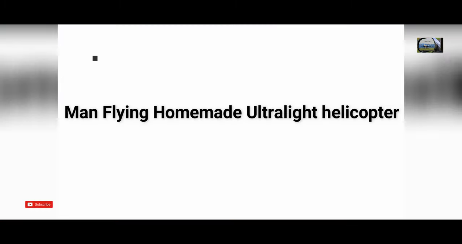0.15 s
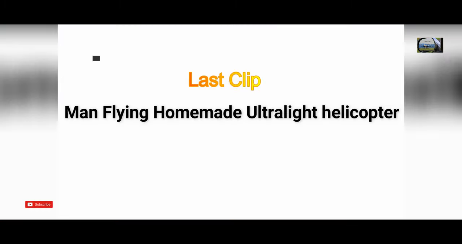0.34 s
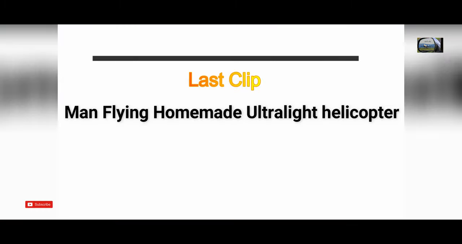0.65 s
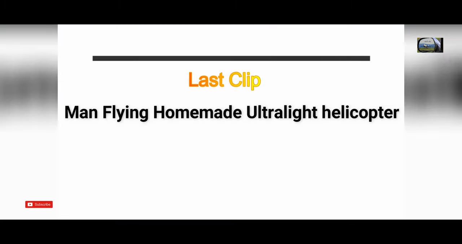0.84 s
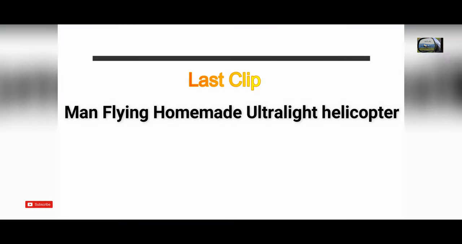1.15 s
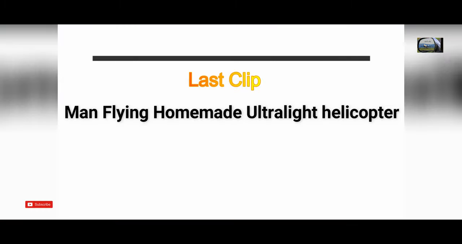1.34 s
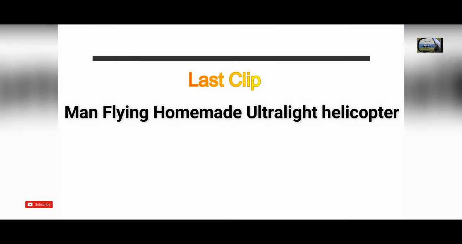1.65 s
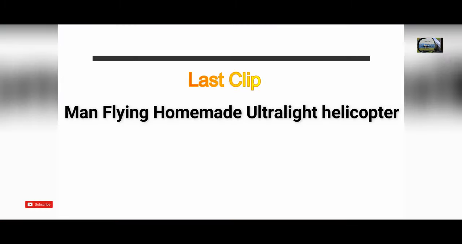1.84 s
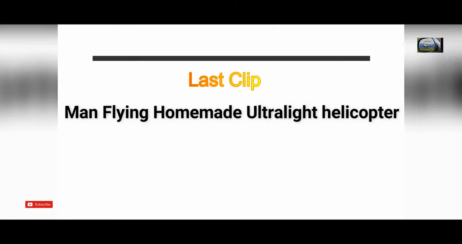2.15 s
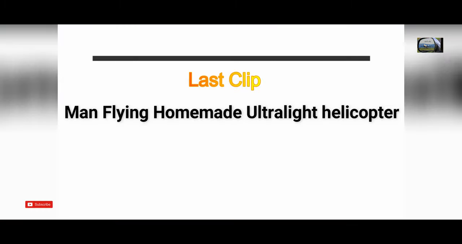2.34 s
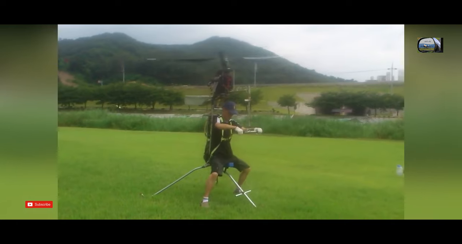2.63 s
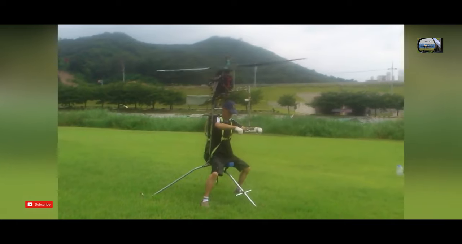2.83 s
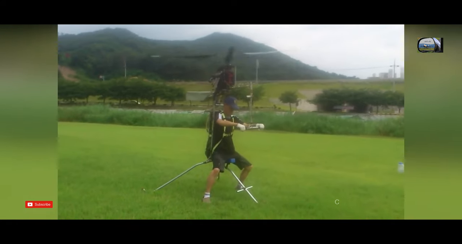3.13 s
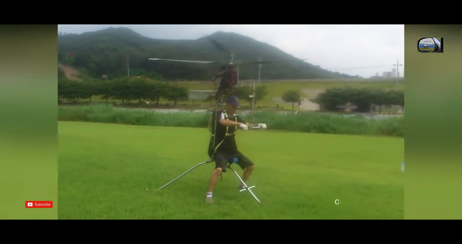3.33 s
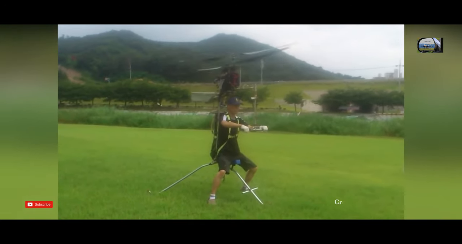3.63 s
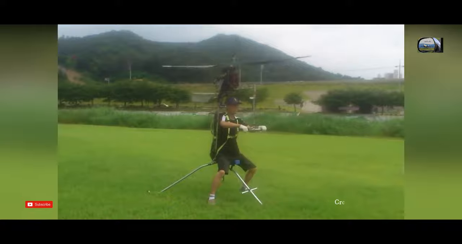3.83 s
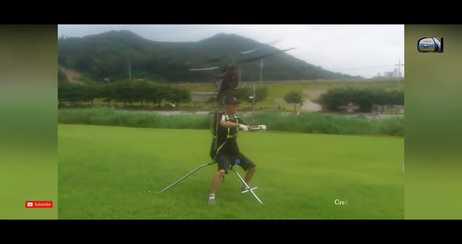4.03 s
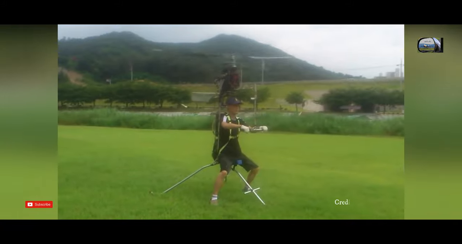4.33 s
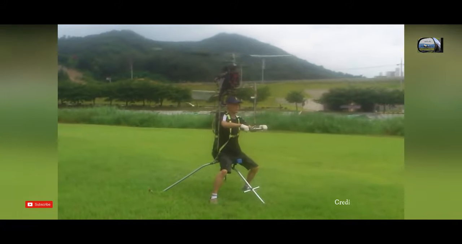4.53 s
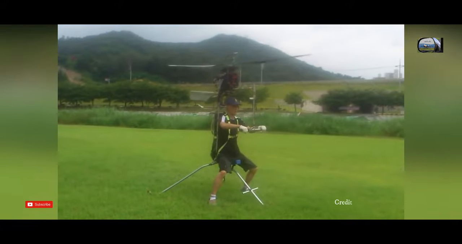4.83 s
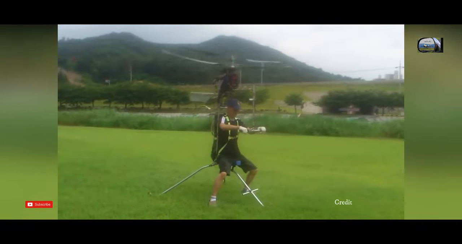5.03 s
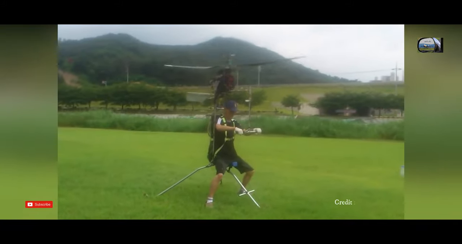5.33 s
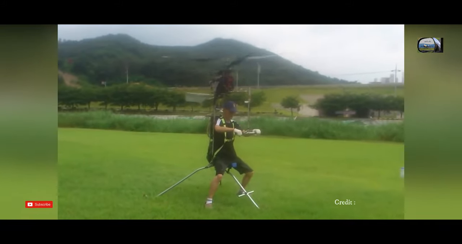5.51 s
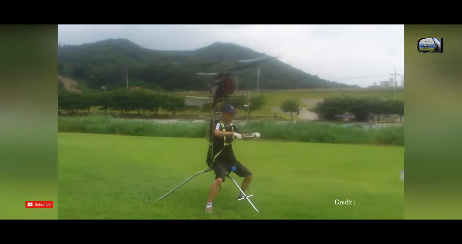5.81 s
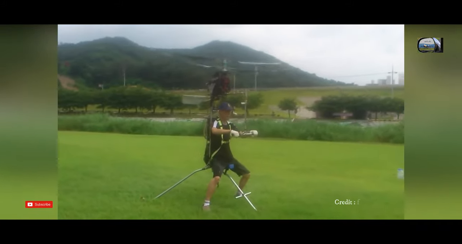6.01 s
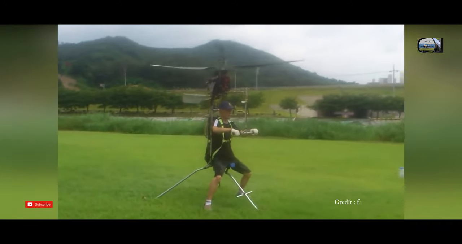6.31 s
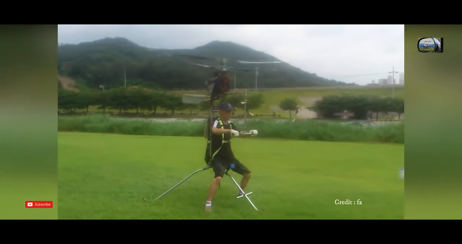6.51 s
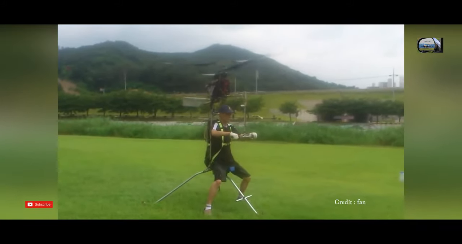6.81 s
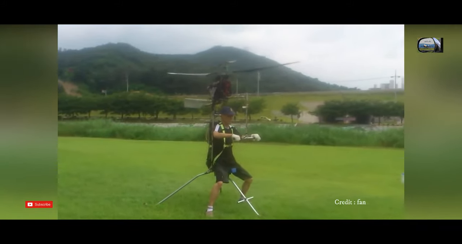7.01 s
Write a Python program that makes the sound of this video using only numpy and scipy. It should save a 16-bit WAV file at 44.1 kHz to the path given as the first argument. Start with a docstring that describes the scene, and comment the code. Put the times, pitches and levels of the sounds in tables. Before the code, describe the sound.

From about 0.2 seconds, the small two-stroke engine of a backpack helicopter idles in an open field. It pulses quickly and roughly, with soft puffs and irregular sharper pops, a tinny exhaust rasp and a low, hollow rumble underneath. At about 3.2 seconds the throttle opens. The engine gives a brief growl, rises quickly in pitch, and by 3.5 seconds fires evenly in a hard buzz with a bass note. From there the pitch climbs slowly as the rotor gathers speed, and a grainy hiss from the drive swells. From around 4.5 to 6 seconds the rasp smooths into a more ringing drone. Rotor wind buffets the microphone in short low gusts between 6.3 and 6.7 seconds. The engine stays near the centre and is still running fast at the end, just after 7 seconds.

```python
"""Backpack helicopter run-up

A twin-cylinder two-stroke idles on an open field, then opens up and turns its rotor. At idle most strokes only
puff and some catch with a pop; under throttle both cylinders fire every turn. Each stroke rings silencer, shell
and headers and lets out a rasp of gas, over the low, hollow churn of the rotor wash. The drive hisses and rotor
wash buffets the microphone."""
import sys
import numpy as np
from scipy import signal
from scipy.fft import rfft, irfft
from scipy.io import wavfile
from scipy.ndimage import uniform_filter1d

SR = 44100
rng = np.random.default_rng(int(sys.argv[2]) if len(sys.argv) > 2 else 0)


def generate_wav(sig):
    """Save sig (samples, or channels by samples) to the path in sys.argv[1] as 16-bit PCM at SR."""
    pcm = np.round(np.clip(np.atleast_2d(sig).T, -1, 1) * 32767).astype(np.int16)
    wavfile.write(sys.argv[1], SR, pcm)


N = 315756

FIRST_STROKE_S, THROTTLE_OPEN_S = 0.193, 3.21
LOAD_S, ALL_FIRE_S = 3.34, 3.468  # misses start to die out; last miss is over
SMOOTH_FROM_HZ, SMOOTH_SPAN_HZ = 99, 10.6  # firing rates over which the rasp falls away

# climb under throttle (time [s], firing rate [Hz])
FIRING_CLIMB = [(3.37, 77.69), (3.48, 85.99), (3.53, 88.55), (3.6, 89.95), (3.66, 93.7), (3.8, 96.35),
                (4.28, 97.55), (4.52, 100.14), (4.62, 100.51), (4.72, 101.91), (5.12, 104.78),
                (5.24, 103.92), (5.38, 107.0), (5.88, 111.18), (6.07, 113.37), (6.25, 114.45),
                (6.65, 118.4), (7.14, 120.75)]
# idle strokes that catch (time [s], relative exhaust level [dB], relative gas level [dB])
IDLE_POPS = [(0.206, -25, -35.5), (0.2216, -25.5, -33), (0.2339, -30, -26.5), (0.2501, -23, -34),
             (0.278, -28, -39), (0.349, -25, -27), (0.3637, -26.5, -41), (0.3914, -23.1, -27.5),
             (0.4612, -25.5, -30), (0.4892, -25, -29.5), (0.5057, -24.5, -35), (0.5342, -22.5, -29),
             (0.6032, -24, -31.5), (0.632, -26, -38), (0.646, -27, -41), (0.6756, -23, -26),
             (0.746, -28, -33), (0.774, -24, -29.5), (0.79, -25.5, -35), (0.82, -29.5, -41),
             (0.8476, -26.5, -36), (0.8747, -27, -35), (0.8882, -27, -31), (0.916, -26, -41),
             (0.945, -26.5, -44), (0.9878, -24, -30.5), (1.0022, -29, -33), (1.0292, -28, -29),
             (1.102, -23, -29), (1.1306, -25, -39), (1.1427, -34, -35), (1.1716, -26, -28.5),
             (1.2437, -26, -33.5), (1.2736, -23.5, -30.5), (1.3143, -25.8, -30.0), (1.372, -28, -42),
             (1.3863, -26.5, -35), (1.416, -23.4, -26), (1.4293, -30, -32), (1.4564, -26, -31.5),
             (1.558, -23.6, -30), (1.5875, -25.5, -32), (1.6009, -27, -29), (1.688, -27.5, -28.5),
             (1.7031, -25.5, -34), (1.731, -23, -32.5), (1.774, -30, -47), (1.832, -25, -28.5),
             (1.847, -25, -39), (1.875, -22.5, -30), (1.946, -26, -32), (1.9744, -25, -28),
             (1.99, -26, -33), (2.018, -25, -38), (2.089, -27, -32), (2.1167, -25, -26),
             (2.16, -25.5, -34.5), (2.203, -28, -42), (2.2313, -26, -26), (2.2474, -24, -30),
             (2.259, -25, -28.5), (2.331, -28.5, -40), (2.36, -27.5, -36), (2.374, -26.5, -26.5),
             (2.3885, -24, -37), (2.4011, -25, -30), (2.43, -26.5, -44), (2.488, -26, -41),
             (2.5016, -25, -35.5), (2.5153, -32, -27), (2.5307, -24, -29.5), (2.5437, -23, -30),
             (2.601, -29, -42), (2.6441, -27, -34.5), (2.658, -34, -34), (2.6734, -22.5, -28),
             (2.6882, -21.5, -30), (2.773, -27, -40), (2.787, -25, -41), (2.8013, -32, -27),
             (2.817, -23, -29.5), (2.859, -28, -48), (2.886, -26, -32), (2.915, -23, -29),
             (2.9297, -27, -49), (2.9582, -21, -26.5), (3.028, -30, -35), (3.0575, -25, -25),
             (3.072, -28, -40), (3.1008, -24.5, -29.5), (3.1289, -25, -38), (3.1707, -29, -27.5),
             (3.199, -24, -29), (3.241, -22, -25.5), (3.269, -23.0, -28), (3.3079, -26, -26.5),
             (3.3345, -22.8, -27), (3.3486, -19.5, -27), (3.375, -23, -33.5), (3.3993, -24, -32),
             (3.4115, -21, -21.5), (3.4228, -24.5, -33), (3.4356, -21, -28.5), (3.4472, -19, -29)]
# other idle strokes, a row per cylinder (relative exhaust level [dB], relative gas level [dB])
IDLE_PUFFS = [(-39, -48.5), (-31, -44.5)]

# drive hiss (frequency [Hz], relative density [dB])
HISS_SPECTRUM = [(300, -0.5), (640, -2), (760, 3), (880, -1), (1100, -1), (1800, 2), (3000, -2),
                 (6000, -1.5), (7000, -1.5), (8000, -5.5), (10200, -2.5), (12500, -10), (15500, -16)]
# low, hollow churn of the rotor wash (frequency [Hz], relative density [dB])
CHURN_SPECTRUM = [(30, -45), (60, -11.5), (90, 1), (138, -5), (175, -10), (210, -8.5), (255, -24),
                  (320, -8), (400, -22), (520, -6), (660, -10), (760, -23.5), (1000, -13), (2000, -34)]
# wind on the microphone (frequency [Hz], relative density [dB])
BUFFET_SPECTRUM = [(15, 7), (35, -2), (60, 0), (120, 6), (190, -5), (260, 4), (380, -5), (1500, -70)]
# rotor wash gusts (centre [s], length [s], churn level [dB], buffet level [dB])
WASH_GUSTS = [(3.56, 0.09, -32, -57), (6.325, 0.04, -21, -42), (6.378, 0.03, -21, -42),
              (6.573, 0.07, -47, -41), (6.674, 0.033, -53, -39)]
# gas jet at idle (frequency [Hz], relative density [dB])
IDLE_RASP_SPECTRUM = [(400, -26), (550, -13), (700, -2), (770, -18), (900, 1.5), (1080, 18), (1200, 11.5),
                      (1340, 5), (1450, 11.5), (1620, 14), (1860, -21), (2050, 8), (2230, 4), (2400, -20),
                      (2580, 10), (2780, 8.5), (3050, -3), (3420, -5.5), (3750, 5), (4100, 1.5),
                      (4600, 1.5), (5300, -3.5), (8000, -7), (10200, -2), (15500, -27)]
# gas jet under load (frequency [Hz], relative density [dB])
LOAD_RASP_SPECTRUM = [(400, -18), (550, 11), (760, -6), (1080, 8), (1340, 1), (1550, 5.5), (2000, 0),
                      (2400, -5.5), (2750, 1.5), (3250, -9.5), (3800, 2), (4700, -4), (6200, -5.5),
                      (8000, -10.5), (10200, -1.5), (15500, -22)]
# spit of the open port (frequency [Hz], relative density [dB])
SNAP_SPECTRUM = [(1500, -32), (4000, -14), (8000, -13), (10500, 3), (13000, 0), (15500, -2)]

# silencer, cool gas at idle (nominal frequency [Hz], width [Hz], cylinder 0 [dB], cylinder 1 [dB])
IDLE_SILENCER_MODES = [(204, 41, -16, -12.5), (298, 82, -23, -15), (442, 104, -4.5, -15.5),
                       (510, 124, 2, -2), (528.2, 30, 1, 2), (670, 87, -9.5, -9.5)]
# silencer (nominal frequency [Hz], width [Hz], cylinder 0 [dB], cylinder 1 [dB])
SILENCER_MODES = [(110, 140, -51, -16), (219.4, 55, -11, -16.5), (413, 124, -10, -15.5),
                  (530, 113, 0, -6.5), (573, 60, -1, -3.5), (639, 116, -13, -6), (1014, 242, -8.5, -21),
                  (1134.4, 114, -9, -5.5), (1240, 96, -8.5, -16)]
# header pipes (nominal frequency [Hz], width [Hz], cylinder 0 [dB], cylinder 1 [dB])
HEADER_MODES = [(1537, 132, -10, -7.5), (1603, 164, -19.5, -5.5), (1896, 260, -12, -11),
                (2195, 150, -35, -11.5), (2743, 220, -17, -17.5), (3860, 170, -17, -14.5)]
# silencer shell (frequency [Hz], decay [s], relative level [dB])
SHELL_MODES = [(348.2, 0.031, -26), (1442, .012, -14.5), (1557, 0.027, -19), (2180, 0.019, -31),
               (2580, 0.0089, -25), (2755, 0.016, -29), (3250, 0.01, -23), (3800, 0.0089, -20),
               (3980, 0.0052, -32), (4930, .007, -32)]

# ground reflection dips and peaks (frequency [Hz], width [Hz], gain [dB])
GROUND_BANDS = [(252, 28, -4.5), (753, 59, -8.5), (1364, 74, -3), (2390, 90, 2.5), (3470, 75, 3),
                (4560, 140, -4), (5010, 110, -4)]
# machine drifting towards the middle (time [s], left minus right [dB])
PAN_DRIFT = [(2.6, 0.8), (6.3, 0.2)]
# diffuse sound at the microphone pair (frequency [Hz], coherence [0-1])
MIC_COHERENCE = [(30, 0.14), (70, 1), (200, 1), (600, 0.61), (1100, 0.83), (2000, 0.23), (5000, 0.77),
                 (9000, 0.035), (15000, 0.33)]
# microphone pair imbalance (frequency [Hz], left minus right [dB])
MIC_BALANCE = [(120, -.5), (450, 1), (700, -.5), (1400, 0), (2500, 4), (4000, 2), (6000, 0.4), (8000, 2.7),
               (9600, 19.5), (11000, 14.4), (13000, 10.5), (15500, 9)]
# sign per channel (left, right)
SIDES = np.array([[1], [-1]])


def undb(db):
    """Decibels to gain."""
    return 10 ** (np.asarray(db) / 20)


def curve(table, times):
    """A (time, value) table at the given times."""
    return np.interp(times, *np.transpose(table))


def on_bins(table):
    """A (frequency, value) table on every FFT bin."""
    hz, value = np.transpose(table)
    return np.interp(np.log(np.fft.rfftfreq(N, 1 / SR) + 1), np.log(hz), value)


def unit(x):
    """Scale to rms 1."""
    return x / np.sqrt(np.mean(x ** 2))


def blend(low, high, share):
    """Low at share 0, high at share 1."""
    return low + (high - low) * share


def walk(rate_hz):
    """Random steps, smoothed twice, rms 1."""
    hold = int(SR / rate_hz)
    steps = np.repeat(rng.standard_normal(N // hold + 1), hold)
    return unit(uniform_filter1d(uniform_filter1d(steps, hold), hold)[:N])


def air(spectrum, envelope):
    """Diffuse stereo noise, enveloped and then filtered."""
    coherence = np.clip(on_bins(MIC_COHERENCE), 0, 1)
    mid, side = rfft(rng.standard_normal((2, N)) * envelope)
    pair = mid * np.sqrt(1 + coherence) + SIDES * side * np.sqrt(1 - coherence)
    return irfft(pair * unit(undb(on_bins(spectrum))), N) / np.sqrt(2)


def clicks(times, sizes):
    """Impulses, each split between two adjacent samples."""
    place = np.clip(times * SR, 0, N - 2)
    i = place.astype(int)
    return np.bincount(i, sizes * (1 - place + i), N) + np.bincount(i + 1, sizes * (place - i), N)


def load(t, ramp_s=0.064):
    """0 at idle, 1 under load."""
    return np.clip((t - LOAD_S) / ramp_s, 0, 1)


def settle(t, lag_s):
    """First-order rise from 0 to 1 as the load comes on."""
    return 1 - np.exp(-np.maximum(t - LOAD_S, 0) / lag_s)


def firing_hz(t, idle_hz=70.75, sag_hz=1.1, sag_at_s=1.7):
    """Stroke rate: the idle sags and recovers, then climbs under throttle."""
    idle = [(FIRST_STROKE_S, idle_hz), (sag_at_s, idle_hz - sag_hz), (THROTTLE_OPEN_S, idle_hz)]
    return curve([*idle, *FIRING_CLIMB], t)


def smoothness(times):
    """0 at low revs, 1 once the exhaust note has smoothed out."""
    return np.clip((firing_hz(times) - SMOOTH_FROM_HZ) / SMOOTH_SPAN_HZ, 0, 1)


def strokes(t, wobble_hz=7.5, depth_hz=0.27):
    """Stroke times and cylinders, two per shaft turn; uneven rotor load wobbles the rate."""
    t = t[t >= FIRST_STROKE_S]
    wobble = depth_hz * load(t) * np.sin(2 * np.pi * wobble_hz * t + walk(2)[:len(t)])
    half_turns = np.cumsum(firing_hz(t) + wobble) / SR
    stroke = np.arange(int(half_turns[-1]) + 1)
    return np.interp(stroke, half_turns, t), stroke % 2


def idle_firing(times, cylinder, scatter_db=0.5, jitter_s=0.000169):
    """Soft puffs, each pop replacing the nearest (time [s], exhaust [dB], gas [dB])."""
    rows = np.column_stack([times, np.array(IDLE_PUFFS)[cylinder]])
    rows += rng.standard_normal(rows.shape) * [jitter_s, scatter_db, scatter_db]
    for pop in IDLE_POPS:
        rows[np.argmin(abs(times - pop[0]))] = pop
    return rows


def running_firing(times, cylinder, exhaust_db=-21, gas_db=-29, smooth_db=-12, uneven_db=1.5,
                   lead_s=0.00019, jitter_s=0.000012, scatter_db=1):
    """Every stroke fires, cylinder 1 harsher and early (time [s], exhaust [dB], gas [dB])."""
    rasp_db = gas_db + smooth_db * smoothness(times) + uneven_db * (cylinder - 0.5)
    rows = np.column_stack([times - lead_s * cylinder, np.full(len(times), exhaust_db), rasp_db])
    return rows + rng.standard_normal(rows.shape) * [jitter_s, 0, scatter_db]


def idle_drone(t, times, hum_db=-39, whine_db=-42, hunting=0.02, fade_s=0.29):
    """Idle hum and whine at 4 and 10 times the hunting shaft speed."""
    shaft_hz = uniform_filter1d(np.interp(t, times[1:], 0.5 / np.diff(times)), SR // 5)
    angle = 2 * np.pi * np.cumsum(shaft_hz * (1 + hunting * walk(24.77))) / SR
    idling = np.clip(1 - (t - LOAD_S) / fade_s, 0, 1)
    return idling * (np.sin(4 * angle) * undb(hum_db) + np.sin(10 * angle) * undb(whine_db))


def drive_hiss(t, idle_db=-45, running_db=-25, spool_s=0.87, grain_db=2):
    """Grainy hiss of gears and chain, louder as the rotor spools up."""
    level_db = blend(idle_db, running_db, settle(t, spool_s))
    return air(HISS_SPECTRUM, undb(level_db + grain_db * walk(700)))


def wash_churn(t, idle_db=-34, running_db=-46, calming_s=0.41, flutter_db=0.5):
    """Low, hollow churn of the rotor wash, strongest at idle apart from brief swells with the gusts."""
    level = undb(blend(idle_db, running_db, settle(t, calming_s)))
    for at_s, length_s, swell_db, _ in WASH_GUSTS:
        level += np.exp(-(2 * (t - at_s) / length_s) ** 2) * undb(swell_db)
    return air(CHURN_SPECTRUM, level * undb(flutter_db * walk(21.07)))


def rotor_wash(t, idle_db=-50, slow_db=-76, rise_db_per_s=11, flutter_db=3):
    """Gusty wind on the microphone: drops after idle, then grows as the rotor gathers speed."""
    level = undb(blend(idle_db, slow_db + rise_db_per_s * (t - LOAD_S), load(t)))
    for at_s, length_s, _, gust_db in WASH_GUSTS:
        level += np.exp(-(2 * (t - at_s) / length_s) ** 2) * undb(gust_db)
    return air(BUFFET_SPECTRUM, level * undb(flutter_db * walk(12)))


def jet(times, level_db, rise_s, fall_s):
    """Gas flow per stroke: builds as the port opens, then dies away."""
    age = np.arange(SR // 20) / SR
    puff = (1 - np.exp(-(age / rise_s) ** 2)) * np.exp(-age / fall_s)
    return signal.fftconvolve(clicks(times, undb(level_db)), puff)[:N]


def gas_rasp(t, times, gas_db, ragged_db=2.5, idle_db=9.5, load_db=4, leak_db=-48.5):
    """A ragged jet per stroke: tinny over a steady leak at idle, harsher under load."""
    loaded = times > LOAD_S
    ragged = undb(ragged_db * walk(1500))
    idling = jet(times[~loaded], gas_db[~loaded] + idle_db, rise_s=0.0027, fall_s=0.0062) * ragged
    working = jet(times[loaded], gas_db[loaded] + load_db, rise_s=0.00079, fall_s=0.0068) * ragged
    leak = undb(leak_db) * (1 - load(t))
    return air(IDLE_RASP_SPECTRUM, np.hypot(idling, leak)) + air(LOAD_RASP_SPECTRUM, working)


def gas_speed(times, cool=0.931, hot=1.021, heating_s=0.89, idle_spread=0.03):
    """Relative speed of sound in the exhaust: uneven at idle, rising with heat."""
    scatter = idle_spread * (times < LOAD_S) * rng.standard_normal(len(times))
    return blend(cool, hot, settle(times, heating_s)) + scatter


def pipe_response(modes, cylinder, dispersion, size=2048):
    """Impulse response: steep resonances, deep valleys, minimum phase scaled by dispersion."""
    hz = np.fft.rfftfreq(size, 1 / SR)
    power = sum((undb(levels_db[cylinder]) / (1 + (2 * (hz - mode_hz) / width_hz) ** 2)) ** 2
                for mode_hz, width_hz, *levels_db in modes)
    power *= (hz / (hz + 40)) ** 2  # an open pipe radiates no steady pressure
    cepstrum = irfft(np.log(power + 1e-10) / 2)
    cepstrum[1:size // 2] *= 2
    cepstrum[size // 2 + 1:] = 0
    log_gain = rfft(cepstrum)
    return irfft(np.exp(log_gain.real + 1j * dispersion * log_gain.imag))[:size * 3 // 4]


def pipe_notes(times, cylinder, level_db, speeds, modes, dispersion, gain_db):
    """Each stroke rings its cylinder's pipe; pitch scales with the speed of sound."""
    responses = [pipe_response(modes, c, dispersion) for c in range(2)]
    age = np.arange(len(responses[0]))
    starts = np.clip(times * SR, 0, N - 1)
    out = np.zeros(N + len(age))
    for start, c, gain, speed in zip(starts, cylinder, undb(level_db + gain_db), speeds):
        ring = np.interp((age - start % 1) * speed, age, responses[c], left=0, right=0)
        out[int(start) + age] -= gain * ring
    return out[:N]


def silencer(times, cylinder, exhaust_db, split_hz=800, sing_db=-1.6, sing_db_per_hz=0.17):
    """Low modes boom with each stroke, hollow at idle; high modes sing out at high revs."""
    low = [mode for mode in SILENCER_MODES if mode[0] < split_hz]
    high = [mode for mode in SILENCER_MODES if mode[0] >= split_hz]
    lift_db = sing_db + sing_db_per_hz * np.maximum(firing_hz(times) - SMOOTH_FROM_HZ, 0)
    idle = times < LOAD_S
    speeds = gas_speed(times)
    idle_speeds = 1 + 0.01 * rng.standard_normal(len(times))
    hollow = pipe_notes(times[idle], cylinder[idle], exhaust_db[idle], idle_speeds[idle],
                        IDLE_SILENCER_MODES, dispersion=1, gain_db=48)
    boom = pipe_notes(times[~idle], cylinder[~idle], exhaust_db[~idle], speeds[~idle],
                      low, dispersion=0.97, gain_db=48.5)
    sing = pipe_notes(times, cylinder, exhaust_db + lift_db, speeds, high, dispersion=1.18, gain_db=47.5)
    return hollow + boom - sing  # phase flips past the valley between the groups


def shell_ring(times, level_db, running_db=-10, scatter_db=4.5):
    """Strokes ring the tinny shell, varying in colour at idle; steady flow under load subdues it."""
    age = np.arange(SR // 8) / SR
    colours_db = scatter_db * rng.standard_normal((len(times), len(SHELL_MODES))).T * (1 - load(times))
    blows_db = level_db + running_db * load(times)
    out = np.zeros(N)
    for (hz, decay_s, mode_db), colour_db in zip(SHELL_MODES, colours_db):
        ring = np.exp(-age / decay_s) * np.sin(2 * np.pi * hz * age)
        out += signal.oaconvolve(clicks(times, undb(blows_db + mode_db + colour_db)), ring)[:N]
    return out


def header_crack(times, cylinder, gas_db, idle_db=-5, running_db=2.9, smooth_db=7.5):
    """The harder the gas escapes, the more the headers crack."""
    level_db = gas_db + blend(idle_db, running_db, load(times)) + smooth_db * smoothness(times)
    speeds = gas_speed(times)
    return pipe_notes(times, cylinder, level_db, speeds, HEADER_MODES, dispersion=0.97, gain_db=45)


def port_snap(times, gas_db, peak_s=0.0028, width_s=0.0008, running_db=-7, scatter_db=3):
    """Each jet spits brightly when the port is wide open."""
    age = np.arange(SR // 100) / SR
    spit = np.exp(-abs(age - peak_s) / width_s)
    level_db = gas_db + running_db * load(times) + scatter_db * rng.standard_normal(len(times))
    return air(SNAP_SPECTRUM, signal.fftconvolve(clicks(times, undb(level_db)), spit)[:N])


def firing_phase(t, times):
    """Phase [rad], one cycle per stroke."""
    return 2 * np.pi * np.interp(t, times, np.arange(len(times)))


def throb(t, times, level_db=-28, swell_s=0.5):
    """Under throttle the gas flow swells once per firing: a clean bass note."""
    flow = np.clip((t - THROTTLE_OPEN_S) / swell_s, 0, 1) * (t < times[-1])
    return np.sin(firing_phase(t, times)) * flow * undb(level_db)


def opening_growl(t, times, level_db=-37, peak_s=3.43, width_s=0.13):
    """Leaving idle, the pipe drones briefly at 4 times the firing rate."""
    swell = np.exp(-((t - peak_s) / width_s) ** 2)
    return np.sin(4 * firing_phase(t, times)) * swell * undb(level_db)


def ground_reflection(sound):
    """The reflection off the grass cuts or lifts narrow bands."""
    hz = np.fft.rfftfreq(N, 1 / SR)
    gain_db = sum(db / (1 + (2 * (hz - band_hz) / width_hz) ** 2)
                  for band_hz, width_hz, db in GROUND_BANDS)
    return irfft(rfft(sound) * undb(gain_db), N)


def scene():
    """Engine, drive and rotor wash over grass, in stereo."""
    t = np.arange(N) / SR
    beats, cylinder = strokes(t)
    idle, running = idle_firing(beats, cylinder), running_firing(beats, cylinder)
    times, exhaust_db, gas_db = np.where((beats > ALL_FIRE_S)[:, None], running, idle).T
    rings = silencer(times, cylinder, exhaust_db) + shell_ring(times, (exhaust_db + gas_db) / 2)
    crack = header_crack(times, cylinder, gas_db)
    gas = gas_rasp(t, times, gas_db) + port_snap(times, gas_db)
    tones = idle_drone(t, times) + throb(t, times) + opening_growl(t, times)
    machine = rings + crack + gas + tones + drive_hiss(t) + wash_churn(t) + rotor_wash(t)
    return ground_reflection(machine) * undb(SIDES * curve(PAN_DRIFT, t) / 2)


def record(dry, right_lag_s=0.000015, ceiling=0.28, start_s=0.175, fade_s=0.0089, top_hz=15750):
    """Microphone pair, right side duller and later; soft clip, delayed fade-in, low-pass."""
    balance = undb(SIDES * on_bins(MIC_BALANCE) / 2)
    lead = np.exp(1j * np.pi * right_lag_s * SIDES * np.fft.rfftfreq(N, 1 / SR))
    heard = irfft(rfft(dry) * lead * balance / balance.mean(axis=0), N)
    rounded = ceiling * np.tanh(heard / ceiling)
    fade_in = np.clip((np.arange(N) / SR - start_s) / fade_s, 0, 1)
    lowpass = signal.ellip(12, 0.2, 80, top_hz, fs=SR, output="sos")
    return signal.sosfilt(lowpass, fade_in * rounded)


dry = scene()
out = record(dry)
generate_wav(out)
```